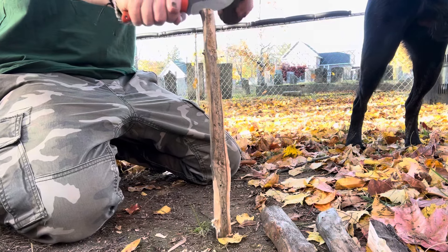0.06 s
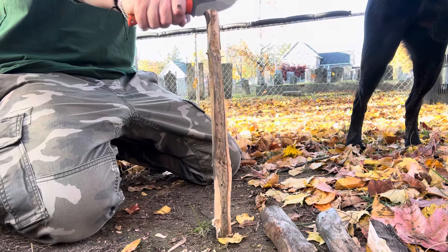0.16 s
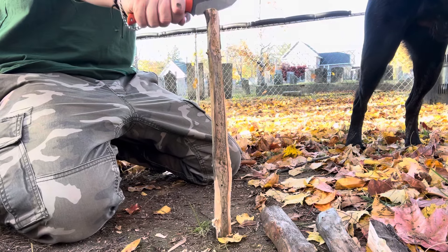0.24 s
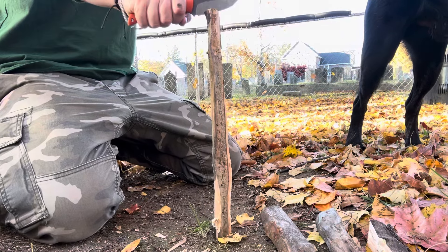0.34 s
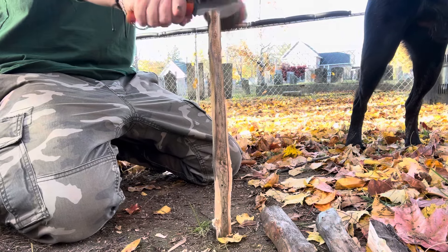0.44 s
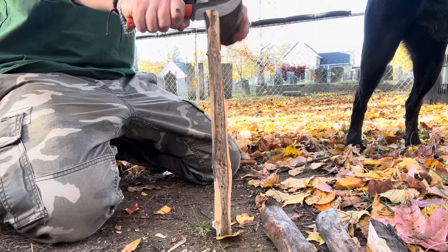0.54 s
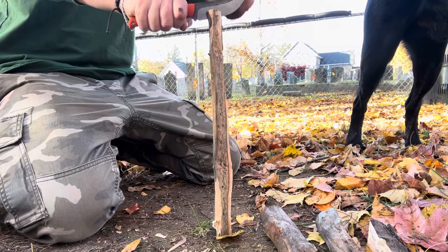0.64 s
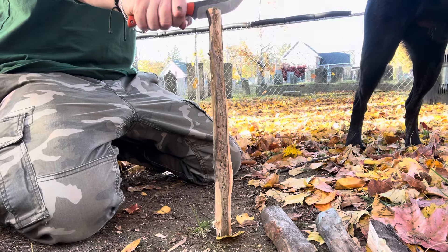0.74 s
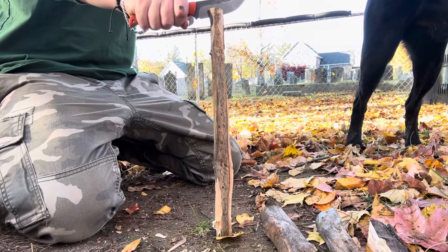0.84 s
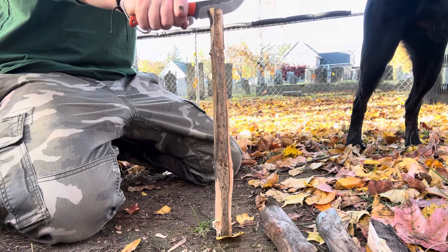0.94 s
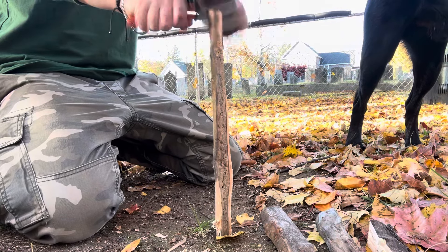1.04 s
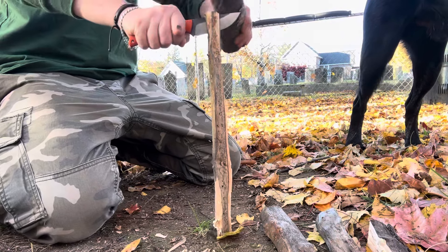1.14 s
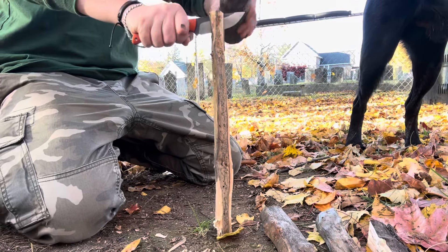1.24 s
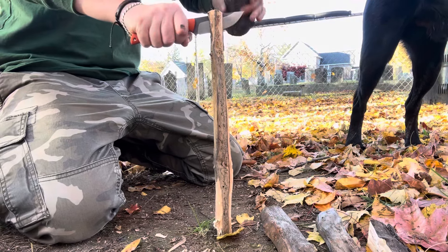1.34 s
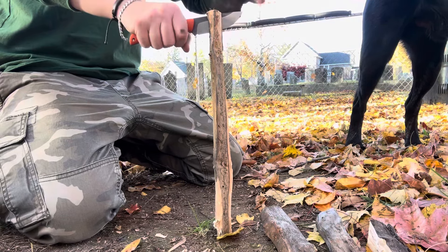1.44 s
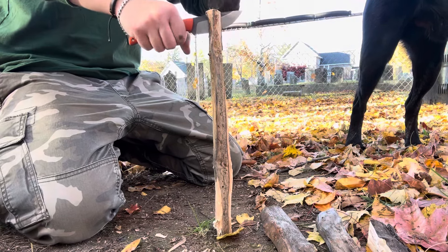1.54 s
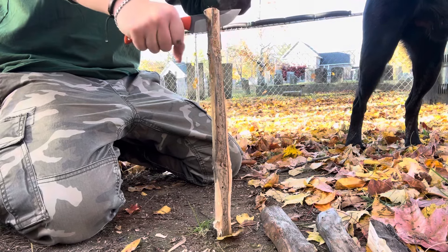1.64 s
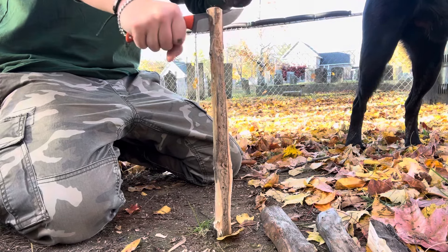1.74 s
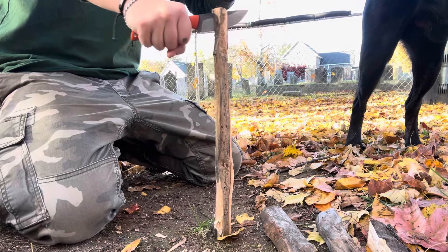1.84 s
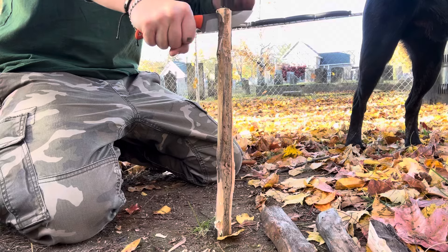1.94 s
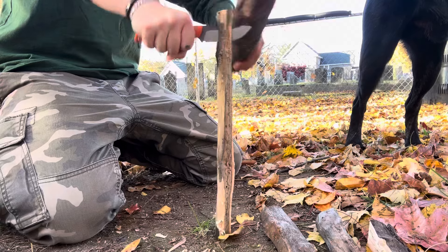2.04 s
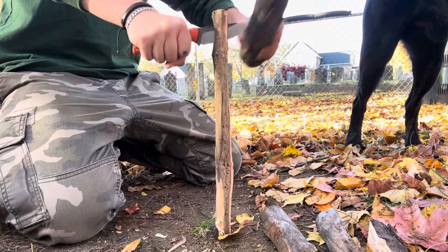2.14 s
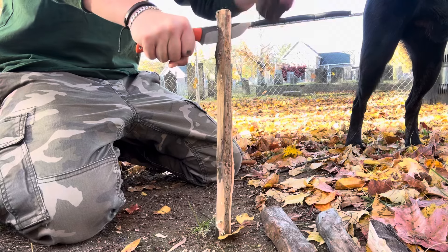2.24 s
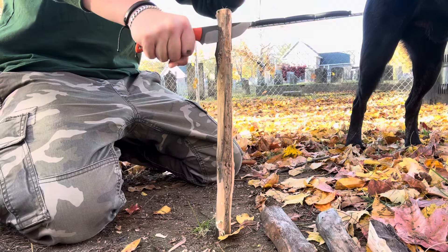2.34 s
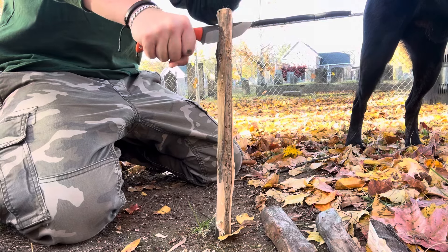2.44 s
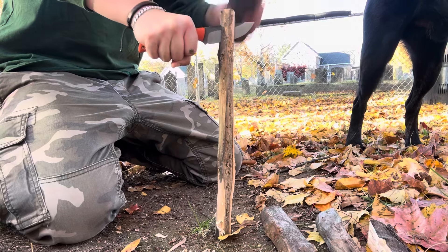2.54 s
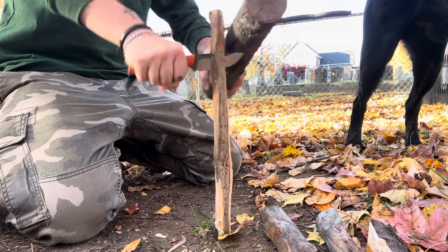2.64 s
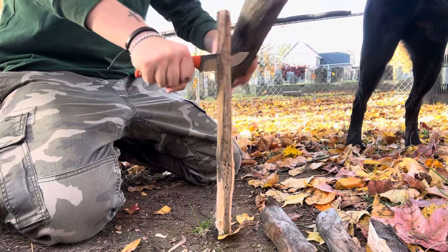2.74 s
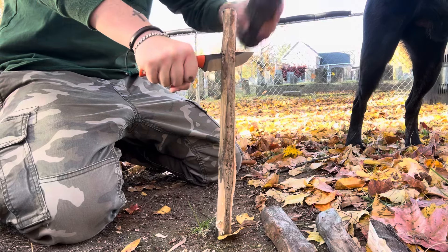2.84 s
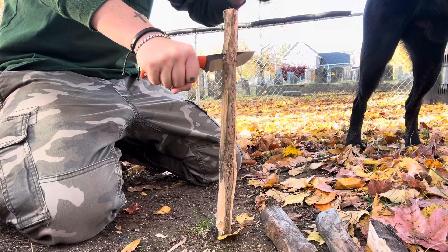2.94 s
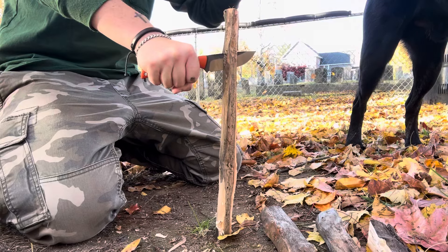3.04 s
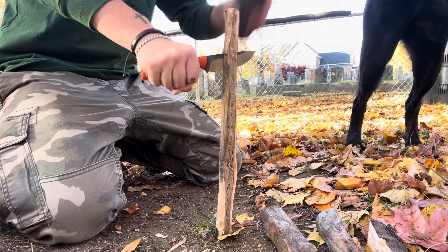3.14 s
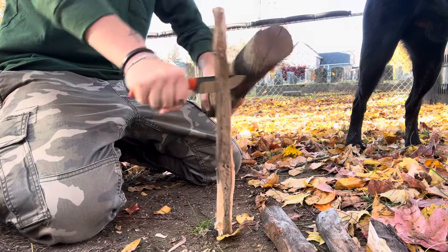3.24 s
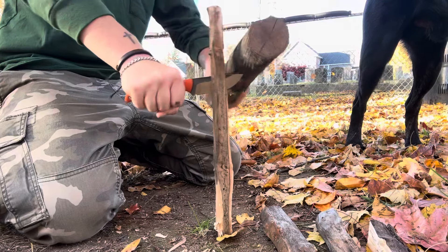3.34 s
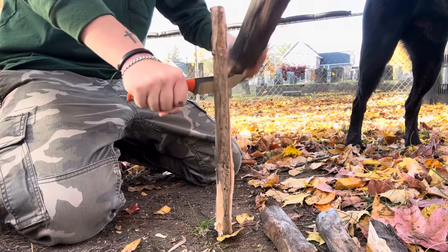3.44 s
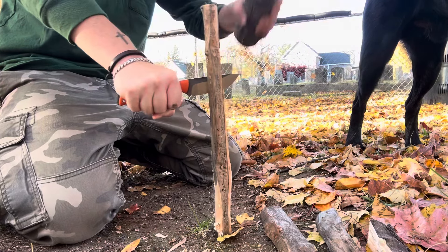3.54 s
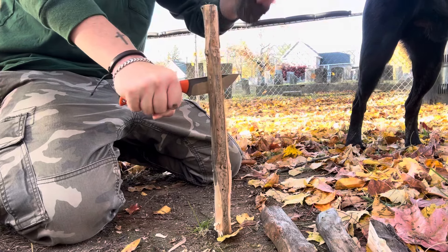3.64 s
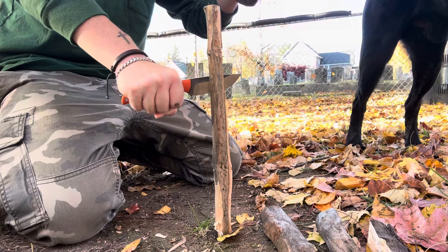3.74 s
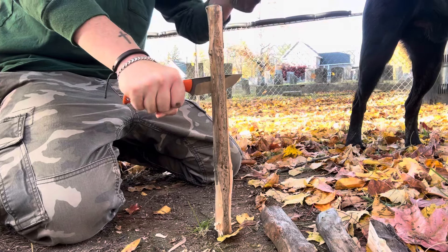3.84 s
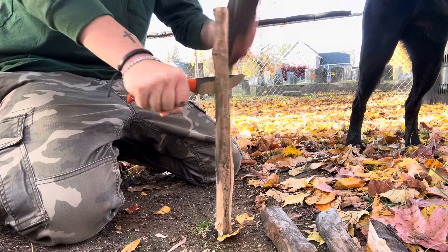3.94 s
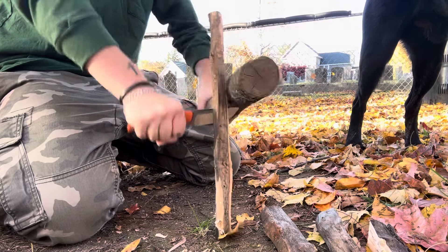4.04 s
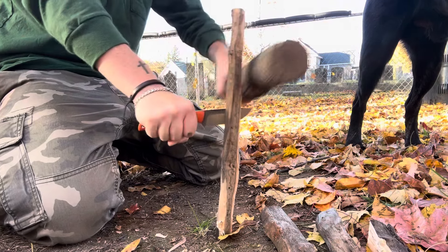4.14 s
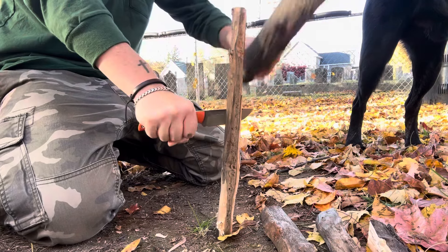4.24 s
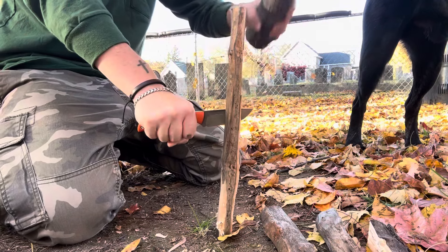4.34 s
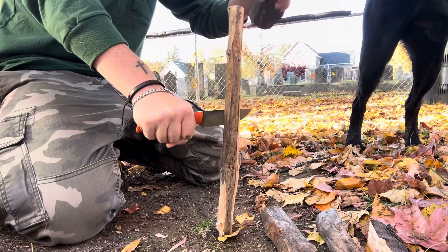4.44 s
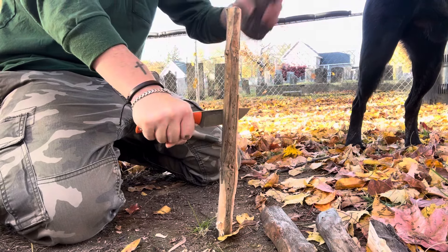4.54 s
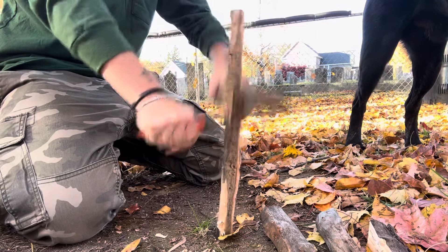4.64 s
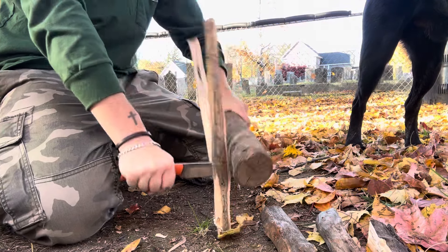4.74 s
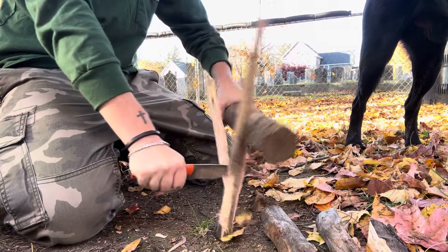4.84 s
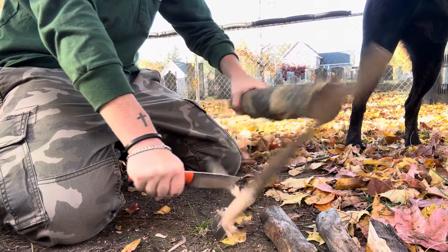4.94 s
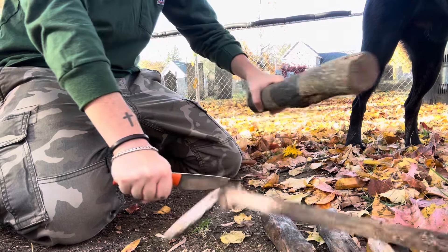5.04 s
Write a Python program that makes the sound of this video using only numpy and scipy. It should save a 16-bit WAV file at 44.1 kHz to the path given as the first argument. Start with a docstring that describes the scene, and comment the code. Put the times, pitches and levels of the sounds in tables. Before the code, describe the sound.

In a leafy yard with a faint hum of far traffic, a stick is split by hitting a knife with a small log, close to the microphones. Seven dry, unevenly spaced knocks land, the first the hardest, each with a short clink of the blade. The later ones bring longer splintering cracks and small scrapes. The wood finally tears apart and a piece falls with a quick, ringing wooden clatter.

```python
"""Distant traffic rumbles and hums beyond a leafy yard. Close by, right of the microphones, a short log
knocks seven times on the spine of a knife, driving it down an upright stick. Each blow rings log and
blade and thumps the stick into the soil; more and more fibres crack until the stick splits and a half
clatters down. Leaves, fence and house answer."""
import sys
import numpy as np
from scipy import signal
from scipy.fft import rfft, irfft, next_fast_len
from scipy.io import wavfile
from scipy.ndimage import uniform_filter1d, minimum_filter1d, map_coordinates

SR = 44100
rng = np.random.default_rng(int(sys.argv[2]) if len(sys.argv) > 2 else 0)


def transcribe(signal):
    """Save signal, clipped to [-1, 1], as a 16-bit WAV file at the path in sys.argv[1]."""
    frames = np.atleast_2d(signal).T
    limited = np.clip(frames, -1, 1)
    pcm = np.round(limited * 32767).astype(np.int16)
    wavfile.write(sys.argv[1], SR, pcm)


N = 224369
TIME = np.arange(N) / SR
AGE = np.arange(SR // 2) / SR  # seconds since a strike

# The log striking the knife. Each row: start in seconds, log level in dB, log pitch in Hz, log t60 in
# seconds, blade and soil thud in relative dB, thud delay in seconds, bite, its woody body and tear in
# relative dB, tear t60 in seconds.
BLOWS = [(0.4665, 1, 1330, 0.0066, -3.5, -8, 0.00792, -14.5, 9, -22.5, .015),
         (1.0673, -10, 1106, 0.066, -3, -10, 0.0089, -15, 8.5, -17, 0.011),
         (2.0369, -1, 1160, 0.018, -8.5, -16, .011, -11.5, -3.5, -9, .014),
         (2.598, -4, 1121, 0.025, -19.5, -22.5, 0.013, -11.5, -2, -7.5, .038),
         (3.2112, -4, 1210, 0.014, -13.5, -18.5, 0.01085, -8.5, 2.5, -7, 0.034),
         (3.9898, -2.5, 1310, 0.018, -18, -21.5, 0.00937, -6.5, -7, -13.5, 0.084),
         (4.6482, -11, 1100, 0.03, -40, -20, 0.0052, -6.5, -6.5, -11, 0.12)]
# Spectra of a bright snap and of the stick's body. Each row: frequency in Hz, relative level in dB.
SNAP = [(1200, -31.5), (2500, -9.5), (3900, 1.5), (5300, 7), (7500, -4.5), (10000, -6.5), (13000, -11.5),
        (16000, -12)]
WOOD = [(100, -12), (350, 5.5), (620, -6), (1100, -3), (1900, -1.5), (3200, -4.5), (6000, -32.5)]


def amp(db):
    """Decibels to gain."""
    return 10 ** (np.asarray(db) / 20)


def unit(x):
    """Scale to rms 1."""
    return x / np.sqrt(np.mean(x ** 2) + 1e-20)


def along(points, hz):
    """Read (Hz, value) points on a log frequency axis."""
    freqs, values = np.transpose(points)
    return np.interp(np.log(hz + 1), np.log(freqs + 1), values)


def curves(rows):
    """One value per sample for each column after the time."""
    times, *columns = np.transpose(rows)
    return [np.interp(TIME, times, column) for column in columns]


def wobble(rate):
    """A smooth random curve, rate knots a second."""
    return map_coordinates(rng.standard_normal(int(N * rate / SR) + 4), [TIME * rate / SR])


def filtered(x, response):
    """Filter x by a response given as a function of Hz."""
    size = x.shape[-1]
    padded = next_fast_len(size + 8192)
    return irfft(rfft(x, padded) * response(np.fft.rfftfreq(padded, 1 / SR)), padded)[..., :size]


def noise(spectrum, size):
    """Coloured noise of rms 1."""
    return unit(filtered(rng.standard_normal(size), lambda hz: amp(along(spectrum, hz))))


def add(track, start, sound):
    """Mix a sound in at start seconds."""
    part = track[round(start * SR):][:len(sound)]
    part += sound[:len(part)]


def traffic():
    """Distant roads: a near-mono rumble, a wider rush and one droning engine that draws away."""
    # The roads' spectrum. Each row: frequency in Hz, relative level in dB.
    spectrum = [(15, -56.5), (25, -42), (51, -6), (93, -4), (125, -7), (154, -10.5), (231, -18),
                (438, -31.5), (856, -33), (1500, -40.5), (2300, -39.5), (7480, -52.5), (10000, -58.5),
                (13800, -76), (15000, -80)]
    # How alike the two microphones hear them. Each row: frequency in Hz, correlation.
    likeness = [(60, 0.95), (180, 0.73), (550, -0.34), (1650, -0.2), (4970, -0.19), (15000, 1)]
    # The traffic's ebb and flow. Each row: time in seconds, rumble and rush in relative dB.
    flow = [(0.0, -39, -58), (1.17, -42.5, -58.5), (1.73, -41, -58), (2.17, -44, -60.5), (4.73, -45.5, -61),
            (5.09, -44.5, -59)]
    # The far engine. Each row: time in seconds, relative level in dB.
    hum = [(0.0, -46), (0.42, -43), (1.03, -47), (1.73, -40.5), (2.18, -49), (3.09, -54.5), (5.09, -58)]
    width = lambda hz: np.tan(np.arccos(np.clip(along(likeness, hz), -1, 1)) / 2)
    mid = noise(spectrum, N)
    side = filtered(noise(spectrum, N), width)
    air = np.array([mid + side, mid - side])
    low = lambda hz: 1 / (1 + (hz / 400) ** 4)
    rumble_db, rush_db = curves(flow)
    rumble = amp(rumble_db + 0.5 + 1.1 * wobble(7)) * unit(filtered(air, low))
    rush = amp(rush_db + 3.5 + 0.5 * wobble(5)) * unit(filtered(air, lambda hz: 1 - low(hz)))
    engine_hz = 124 + 0.61 * wobble(4)
    engine = unit(np.sin(2 * np.pi * np.cumsum(engine_hz) / SR))
    fade_from_s, fade_db_per_s = 1.95, 8.5
    engine_db = curves(hum)[0] + 1.5 - fade_db_per_s * np.maximum(0, TIME - fade_from_s)
    return rumble + rush + amp(engine_db + wobble(6)) * engine


def rustle():
    """Sleeves and dry leaves stir and crackle faintly, close to the microphones."""
    # Sleeves, leaves and the parting halves brushing. Each row: centre in seconds, level in dB,
    # half length in seconds.
    brushes = [(1.429, -58.5, 0.026), (1.617, -72, .085), (3.509, -74, 0.074), (4.788, -59, 0.11)]
    swells = sum(amp(db) * np.exp(-((TIME - centre) / width) ** 2) for centre, db, width in brushes)
    stir = amp(-75.5 + 3.5 * wobble(6))
    crackle = amp(4.5 * wobble(600))
    hiss = noise([(1500, -19.0), (5000, 0.0), (10000, -0.5), (12500, -6.0), (15000, -16.5)], N)
    return (swells + stir) * unit(hiss * crackle)


def ring(modes, attack_s):
    """Damped modes, struck a little differently each time."""
    strengths_db = rng.standard_normal(len(modes))
    tone = sum((-1) ** k * amp(db + strengths_db[k] - 60 * AGE / t60) * np.sin(2 * np.pi * hz * AGE)
               for k, (hz, db, t60) in enumerate(modes))
    return tone * (1 - np.exp(-AGE / attack_s))


def blows(ping_t60=1.2):
    """Log and blade ring at once; a moment later the stick's foot thumps the soil."""
    # The log's modes. Each row: multiple of its pitch, relative level in dB, multiple of its t60.
    log_modes = [(.3, -20.5, 1.2), (.8, -18.5, .4), (.895, -18, 1.3), (1, -6.5, 1), (1.221, -7.5, .5),
                 (1.551, -7, .5), (2.9, -16, .6)]
    # Modes of blade and soil. Each row: frequency in Hz, relative level in dB, t60 in seconds.
    blade_modes = [(1699, -4, 0.017), (2344, -2, 0.024), (2550, -5.5, 0.022), (3300, -18, 0.0058)]
    soil_modes = [(70, -8.5, 0.15), (124.2, 1.5, 0.06), (217, -4.5, 0.063), (359.4, -9.5, .055),
                  (449.5, -12.5, 0.046)]
    # The free blade's after-ring. Each row: frequency in Hz, relative level in dB.
    ping_spectrum = [(1700, -31), (2250, -2.5), (2600, -3), (3200, -40), (6000, -64)]
    out = np.zeros(N)
    for start, log_db, pitch_hz, t60, blade_db, thud_db, thud_delay, *_ in BLOWS:
        log = ring([(ratio * pitch_hz, db, life * t60) for ratio, db, life in log_modes], 0.00012)
        blade = ring(blade_modes, attack_s=0.00017)
        ping = amp(2 * blade_db - 50.5 - 60 * AGE / ping_t60) * noise(ping_spectrum, len(AGE))
        add(out, start, amp(log_db) * log + amp(blade_db) * blade + ping)
        add(out, start + thud_delay, amp(thud_db + 1) * ring(soil_modes, attack_s=0.0081))
    return out


def burst(spectrum, length_s, rattle_db):
    """A run of tiny fractures: uneven grains that die away over length_s, and an after-rattle."""
    t = AGE[:SR // 10]
    grains = amp(4 * unit(uniform_filter1d(rng.standard_normal(len(t)), size=20)))
    rattle = amp(rattle_db - 60 * t / 0.055)
    envelope = (np.exp(-(t / length_s) ** 2) + rattle) * (1 - np.exp(-t / 0.00016))
    sound = noise(spectrum, len(t)) * grains * envelope
    return sound * np.linalg.norm(envelope) / np.linalg.norm(sound)


def crack(start, length_s, body_db, rattle_db=-16):
    """Wood giving way: a bright snap that also shakes the body of the stick."""
    blows_so_far = sum(row[0] < start for row in BLOWS)
    treble = 7 - blows_so_far  # the deepening cleft shades the top
    colour = [(hz, db + treble * along([(6000, 0.11), (10000, 0.81)], hz)) for hz, db in SNAP]
    return burst(colour, length_s, rattle_db) + amp(body_db - 3.5) * burst(WOOD, length_s, rattle_db)


def fibres(snaps=14, gap_s=0.0046, scatter_s=0.0008, scatter_db=1.5):
    """Each blow bites in; the split runs on in a fading string of snaps, longer as the stick weakens."""
    out = np.zeros(N)
    for start, *_, bite_db, body_db, tear_db, tear_t60 in BLOWS:
        add(out, start, amp(bite_db) * crack(start, length_s=0.0023, body_db=body_db, rattle_db=-25.5))
        for k, (early, louder) in enumerate(rng.standard_normal((snaps, 2))):
            age = k * gap_s
            db = tear_db - 60 * age / tear_t60 + scatter_db * louder
            snap = crack(start, length_s=0.002, body_db=-6)
            add(out, start + gap_s + age - scatter_s * early, amp(db) * snap)
    return out


def handling(parting_s=4.812):
    """Lighter sounds around the blows: the log rebounds and scrapes, fibres tick, the halves part."""
    # The log dropping back on the knife. Each row: start in seconds, level in dB.
    rebounds = [(0.5118, -44.5), (2.651, -38), (3.2713, -29)]
    # Strained fibres letting go between blows. Each row: start in seconds, level in dB.
    ticks = [(1.293, -52), (1.306, -48.5), (1.325, -43), (2.854, -47.5), (3.141, -51), (3.161, -47),
             (3.435, -50.5), (3.47, -53.5), (4.755, -37.5), (4.78, -37.5), (4.7969, -28)]
    # The log scraping down the stick to the sunken knife. Each row: start in seconds, level in dB,
    # length in seconds.
    scrapes = [(3.206, -25, 0.0068), (3.98, -25, 0.018), (4.633, -19, 0.031)]
    out = np.zeros(N)
    for start, db in rebounds:
        add(out, start, amp(db) * crack(start, length_s=0.0029, body_db=2))
    for start, db in ticks:
        add(out, start, amp(db) * crack(start, length_s=0.0038, body_db=-11.5))
    for start, db, length_s in scrapes:
        add(out, start, amp(db) * crack(start, length_s, body_db=-6))
    add(out, parting_s, amp(-53.5) * crack(parting_s, length_s=0.03, body_db=7.5))
    return out


def falling_half(landing_s=4.9708):
    """The freed half lands dully on its end, then topples and rings; hard contacts favour high modes."""
    # Its end meeting the dirt. Each row: frequency in Hz, relative level in dB.
    dirt = [(100, -4.5), (300, 1), (560, 6.5), (850, 0), (1400, -45), (2200, -16), (5000, -8),
            (10000, -30.5), (16000, -29)]
    # Its knocks on ground and firewood. Each row: start in seconds, level and hardness in relative dB.
    clatter = [(5.014, -31, -5), (5.023, -38.5, 10.5), (5.0304, -16, -7.5), (5.034, -28.5, 11),
               (5.0709, -28, 4.5), (5.0766, -30.5, 1)]
    # Its modes. Each row: frequency in Hz, relative level in dB, t60 in seconds.
    splint = [(615, -11, .15), (674, -5, .22), (850, -8, .04), (1558, -3, .18), (1680, -6, .04),
              (1803, -2, .12), (2850, -16, .08), (3120, 0, .026), (4280, -13, .025)]
    lowest_hz = splint[0][0]
    out = np.zeros(N)
    add(out, landing_s, amp(-24) * burst(dirt, length_s=0.0053, rattle_db=-4))
    for start, db, hard_db in clatter:
        modes = [(hz, level + hard_db * np.log(hz / lowest_hz), t60) for hz, level, t60 in splint]
        click = amp(hard_db - 8) * burst(SNAP, length_s=0.0015, rattle_db=-0.5)
        scuff = amp(-6.5) * burst(WOOD, length_s=0.0077, rattle_db=-15.5)
        add(out, start, amp(db) * ring(modes, attack_s=0.0001))
        add(out, start, amp(db) * (click + scuff))
    return out


def ground(x, bounce_ms=0.83, high_db=-11.5, low_db=-4.0, sunk_s=2.0, soft_hz=1100):
    """The soil mirrors the sound and hollows the low mids, more as the knife sinks; leaves dull it."""
    strength = amp(np.interp(TIME, [0, sunk_s], [high_db, low_db]))
    bounce = lambda hz: np.exp(-2j * np.pi * hz * bounce_ms / 1000) / (1 + (hz / soft_hz) ** 4)
    return x + filtered(x * strength, bounce)


def microphones(x):
    """The work is off to the right, so it reaches the left microphone later and weaker."""
    # The left microphone's lag. Each row: frequency in Hz, delay in milliseconds.
    lag = [(300, 0.17), (1200, .125), (4000, 0.093), (12000, .1)]
    # The pair's balance. Each row: frequency in Hz, left minus right in dB.
    lean = [(150, -0.5), (700, -2.6), (2200, -1), (4500, -3.25), (9000, -1.1)]
    sides = np.array([[-0.5], [0.5]])
    gain = lambda hz: amp(-sides * along(lean, hz))
    delay = lambda hz: np.exp(2j * np.pi * hz * sides * along(lag, hz) / 1000)
    return filtered(x, lambda hz: gain(hz) * delay(hz))


def near_scatter(x, db=-14, t60=0.02):
    """Nearby leaves throw back a brief scatter, different at each microphone."""
    scatter = rng.standard_normal((2, len(AGE))) * amp(-60 * AGE / t60)
    return amp(db) * signal.fftconvolve(x[None], scatter / np.linalg.norm(scatter[0]), axes=1)[:, :N]


def yard(x, near_db=-25.5, far_db=-28.5, far_delay_s=0.048):
    """Leaves scatter the sound at once; fence and house answer later. Each blow gets its own tail."""
    # The yard's decay. Each row: frequency in Hz, t60 in seconds.
    decay = [(100, 0.9), (500, 0.58), (2400, 0.23), (6000, 0.45), (14000, 0.37)]
    # The echo's colour. Each row: frequency in Hz, relative level in dB.
    colour = [(100, -3), (600, 8), (1200, -13), (2400, 1.5), (5000, -6), (10000, -1), (12000, -4),
              (15000, -17.5)]
    out = np.zeros((2, N))
    blow_number = np.searchsorted([row[0] for row in BLOWS], TIME + 0.1)
    walls = np.exp(-((AGE - far_delay_s) / 0.015) ** 2)
    for k in np.unique(blow_number):
        hz, t, bands = signal.stft(rng.standard_normal((2, SR // 2)), SR, nperseg=256)
        bands *= amp(along(colour, hz)[:, None] - 60 * t / along(decay, hz)[:, None])
        tail = signal.istft(bands, SR, nperseg=256)[1][:, :len(AGE)]
        tail *= (amp(near_db) + amp(far_db) * walls) / np.linalg.norm(tail[0])
        out += signal.fftconvolve((x * (blow_number == k))[None], tail, axes=1)[:, :N]
    return out


def scene():
    """The work close by, the yard around it and the roads beyond."""
    work = ground(blows() + fibres() + handling()) + falling_half() + rustle()
    return microphones(work) + near_scatter(work) + yard(work) + traffic()


def record(dry):
    """A fast limiter holds the peaks; the top is cut steeply at the band limit."""
    ceiling, top_hz = 0.92, 16000
    needed = np.minimum(1, ceiling / (np.abs(dry).max(axis=0) + 1e-9))
    gain = uniform_filter1d(minimum_filter1d(needed, size=21), size=21)
    return filtered(dry * gain, lambda hz: 1 / (1 + (hz / top_hz) ** 70))


dry = scene()
out = record(dry)
transcribe(out)
```